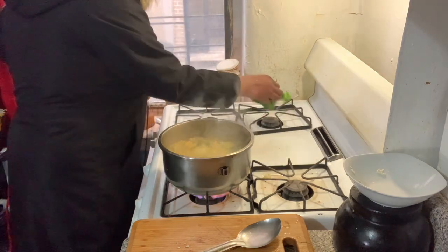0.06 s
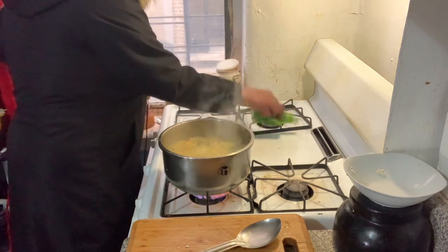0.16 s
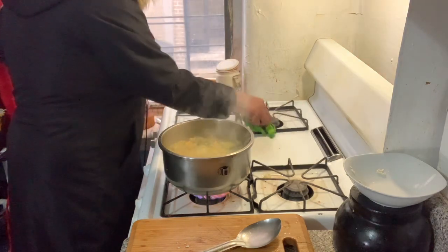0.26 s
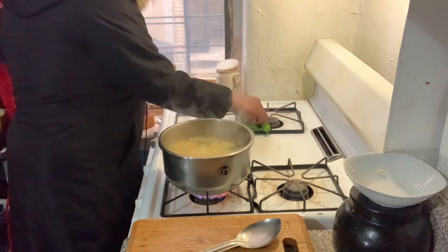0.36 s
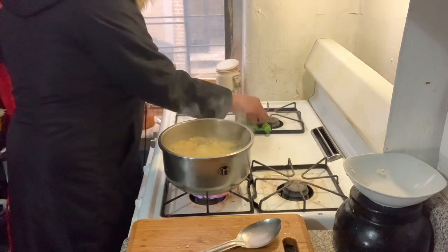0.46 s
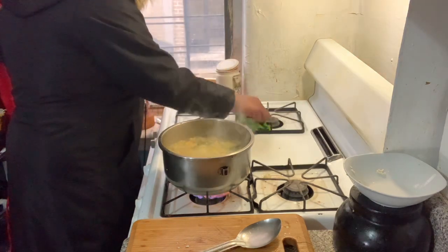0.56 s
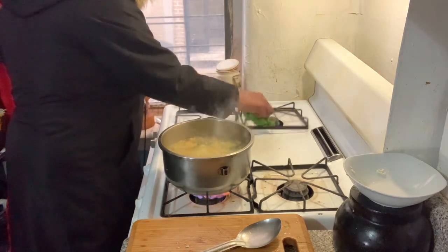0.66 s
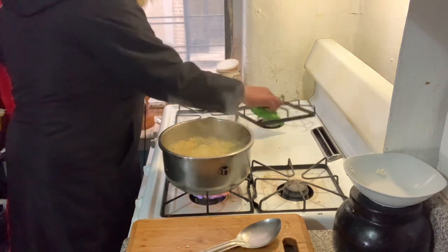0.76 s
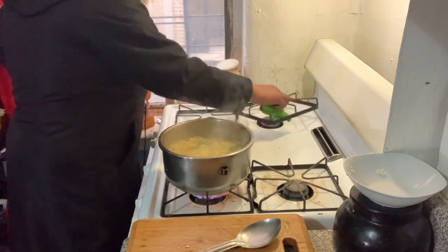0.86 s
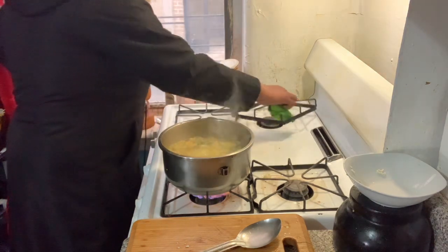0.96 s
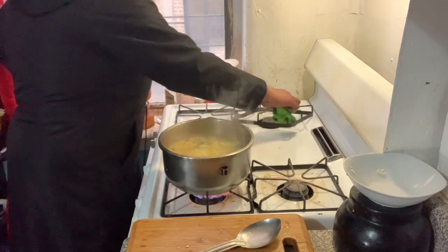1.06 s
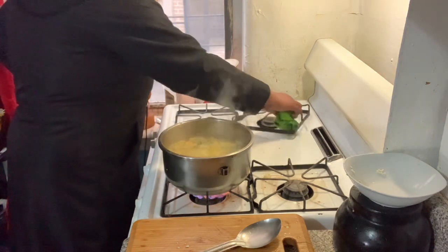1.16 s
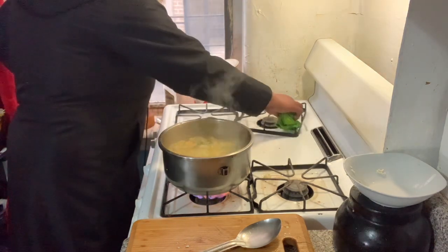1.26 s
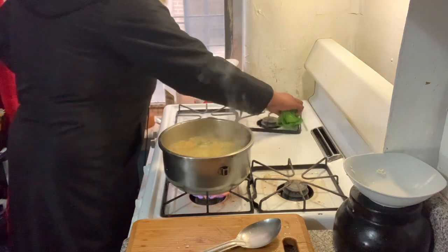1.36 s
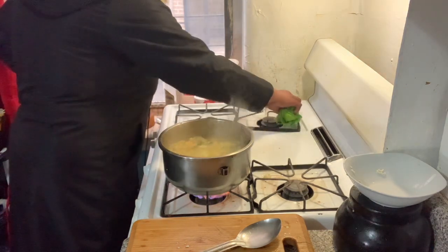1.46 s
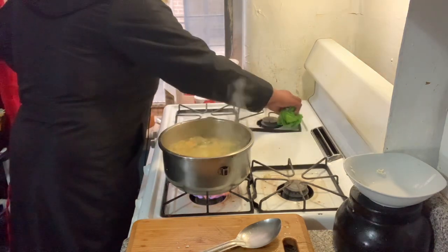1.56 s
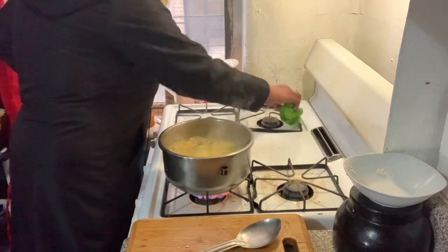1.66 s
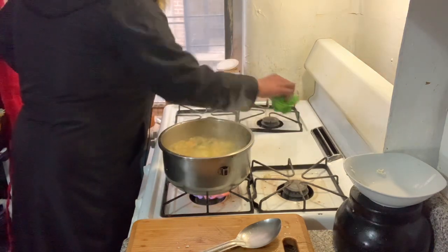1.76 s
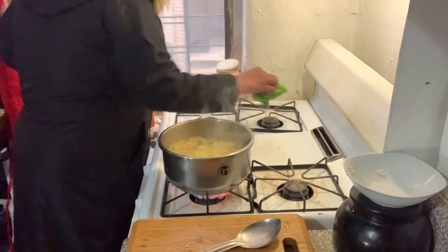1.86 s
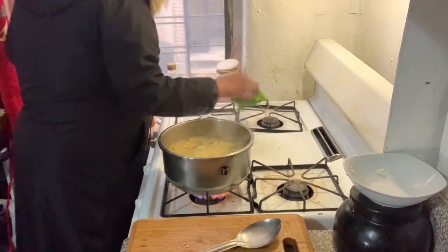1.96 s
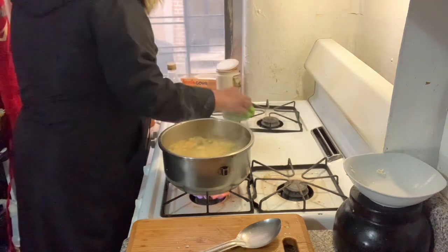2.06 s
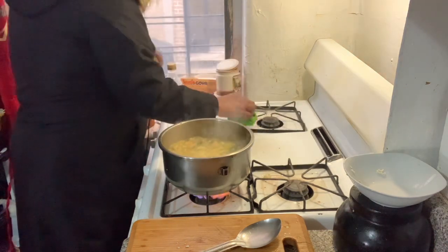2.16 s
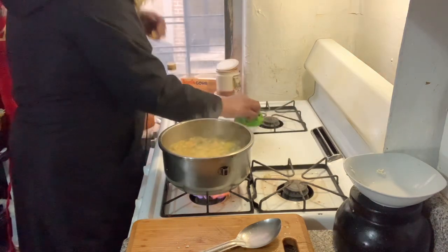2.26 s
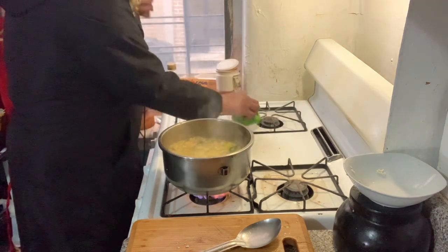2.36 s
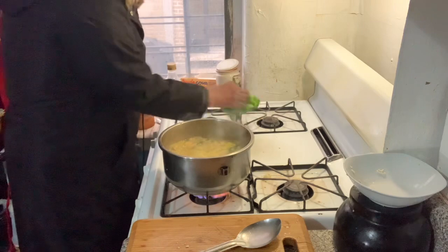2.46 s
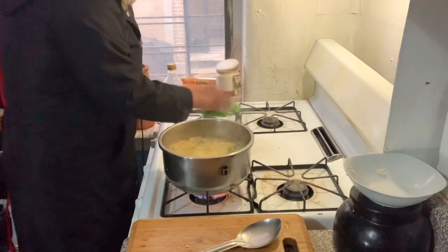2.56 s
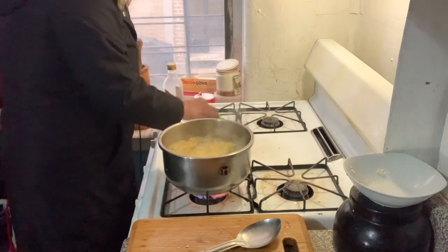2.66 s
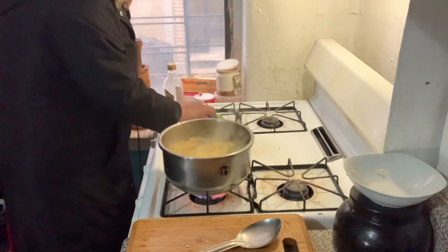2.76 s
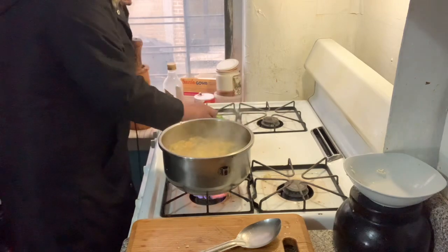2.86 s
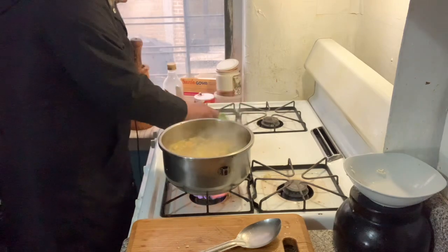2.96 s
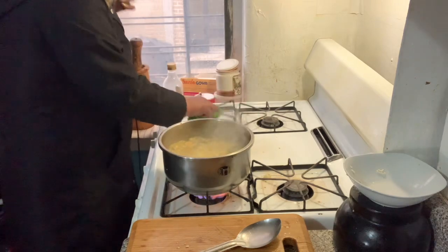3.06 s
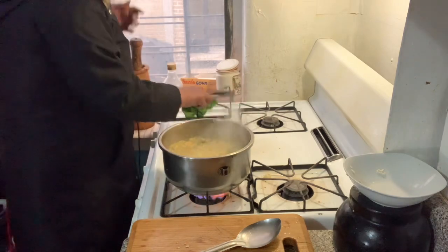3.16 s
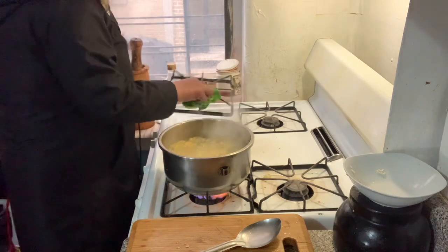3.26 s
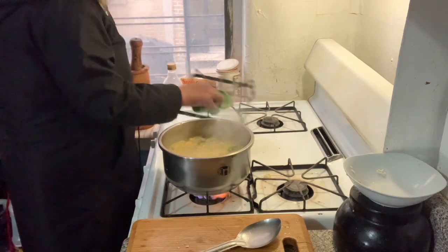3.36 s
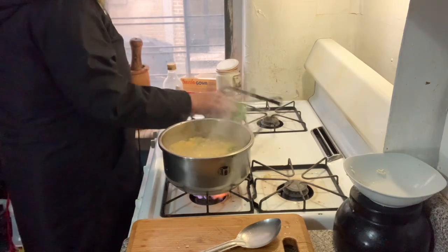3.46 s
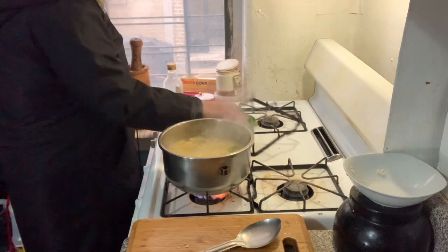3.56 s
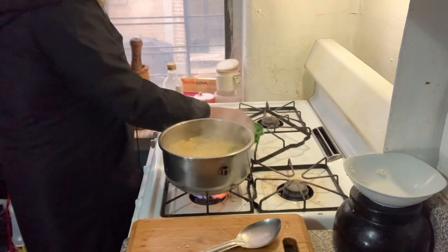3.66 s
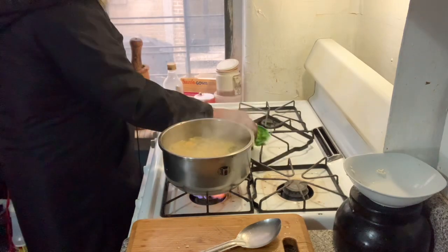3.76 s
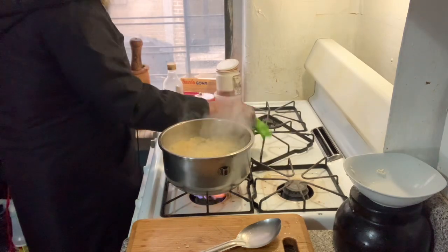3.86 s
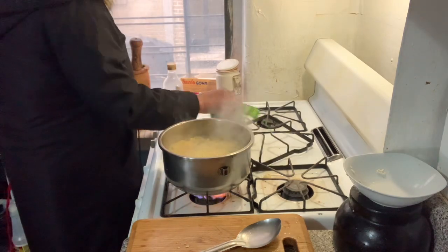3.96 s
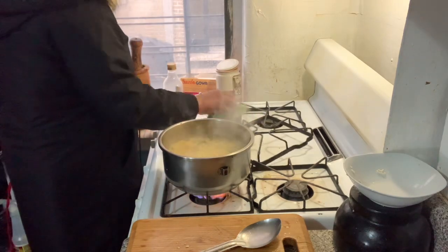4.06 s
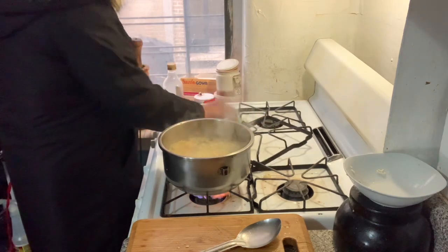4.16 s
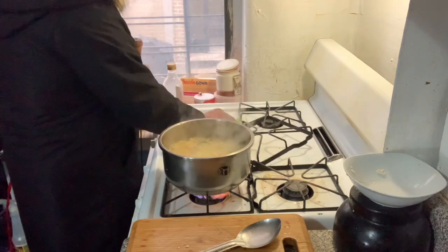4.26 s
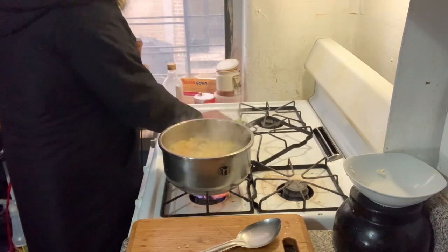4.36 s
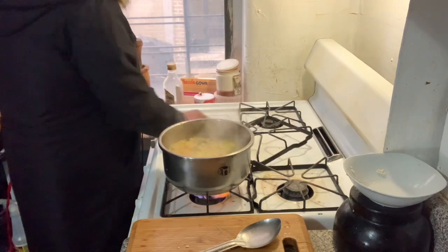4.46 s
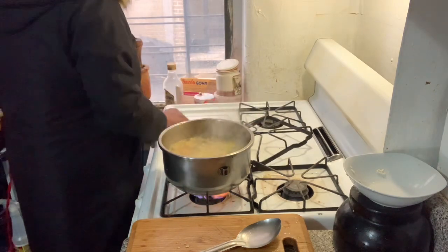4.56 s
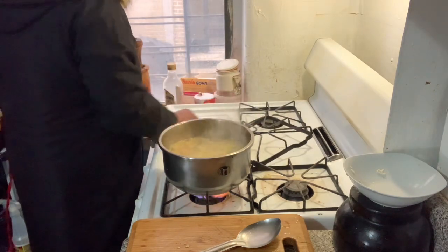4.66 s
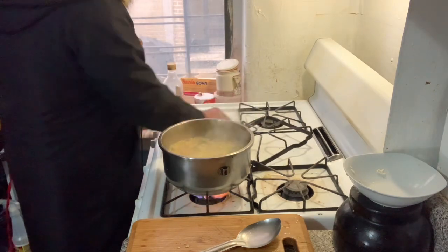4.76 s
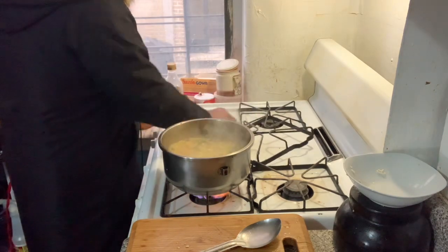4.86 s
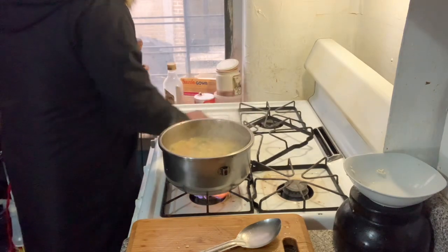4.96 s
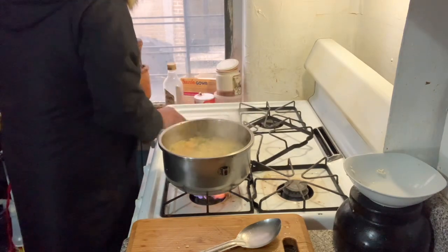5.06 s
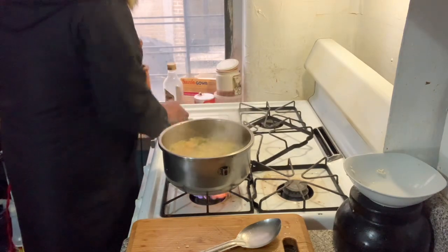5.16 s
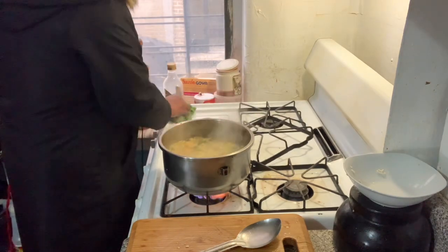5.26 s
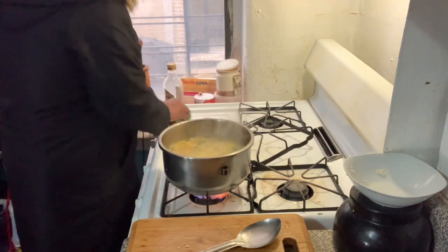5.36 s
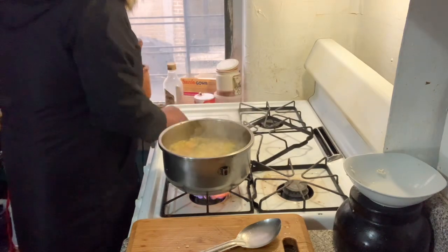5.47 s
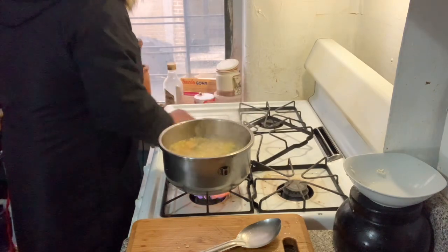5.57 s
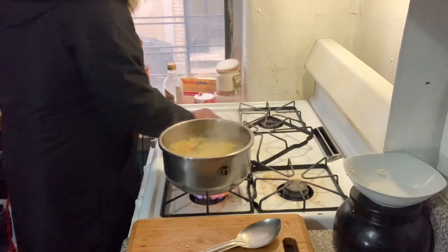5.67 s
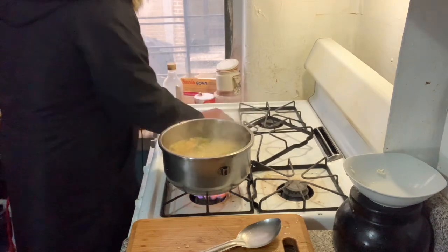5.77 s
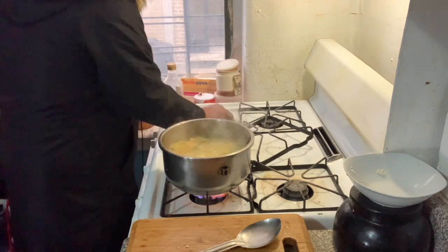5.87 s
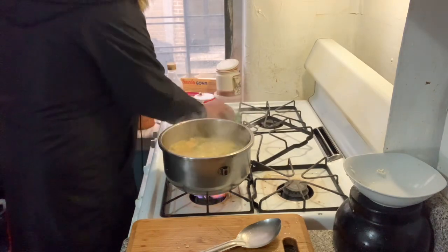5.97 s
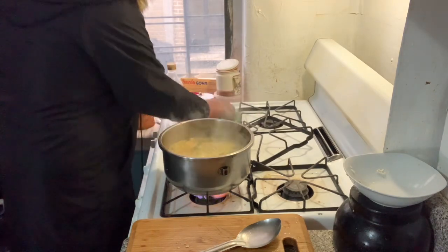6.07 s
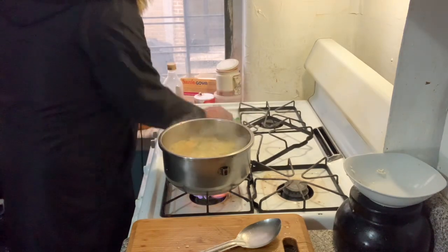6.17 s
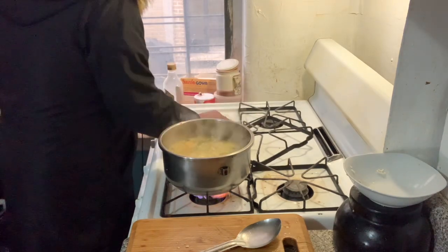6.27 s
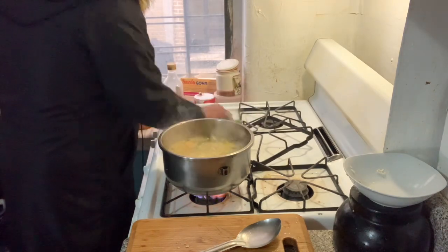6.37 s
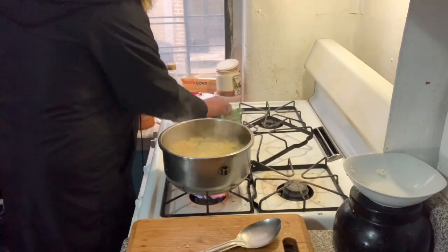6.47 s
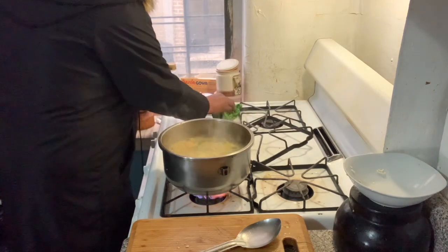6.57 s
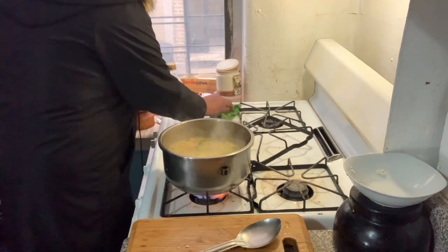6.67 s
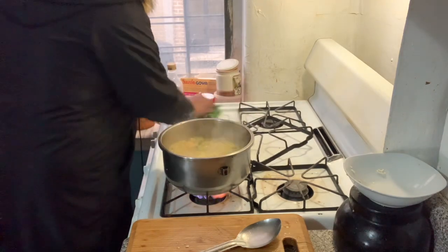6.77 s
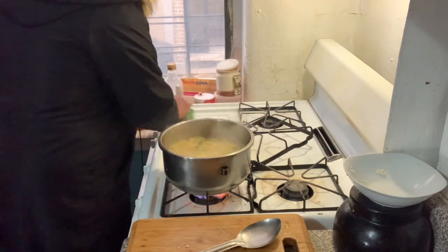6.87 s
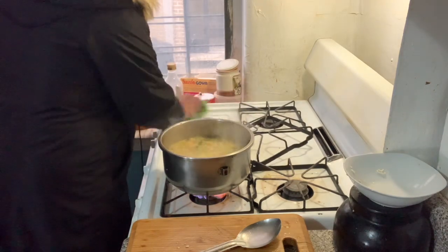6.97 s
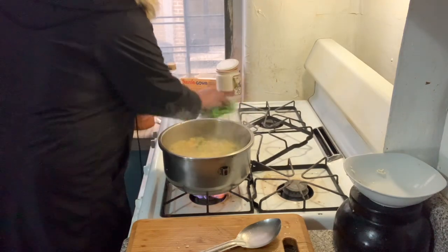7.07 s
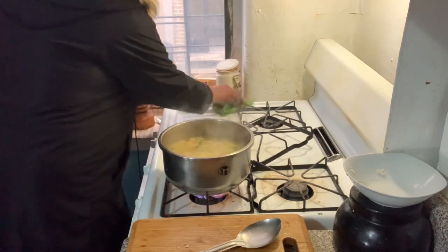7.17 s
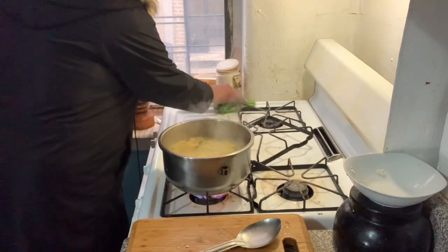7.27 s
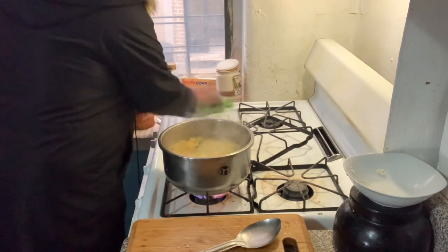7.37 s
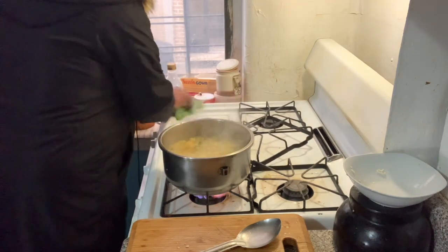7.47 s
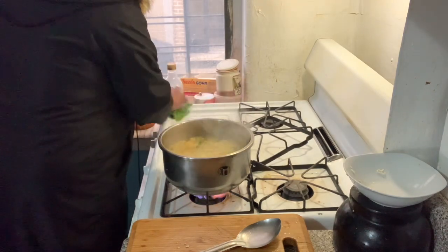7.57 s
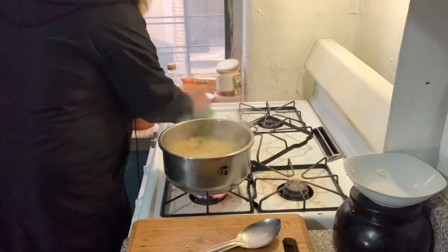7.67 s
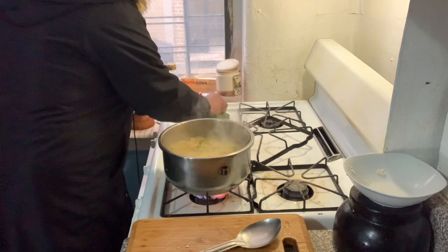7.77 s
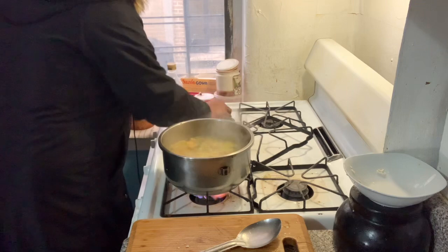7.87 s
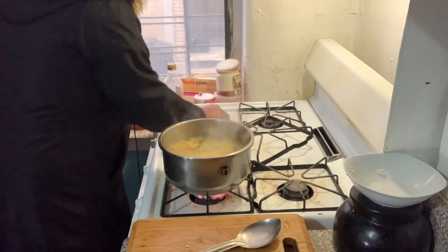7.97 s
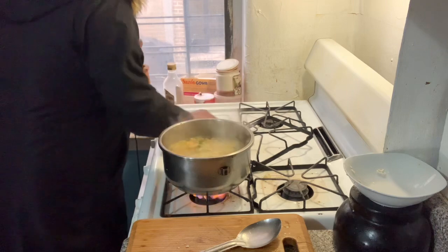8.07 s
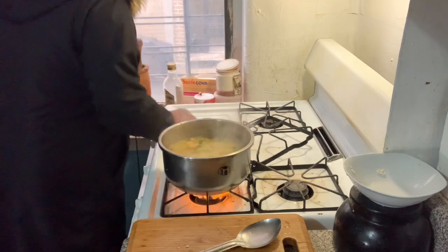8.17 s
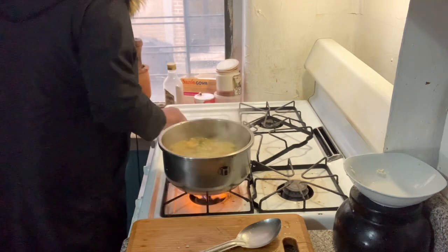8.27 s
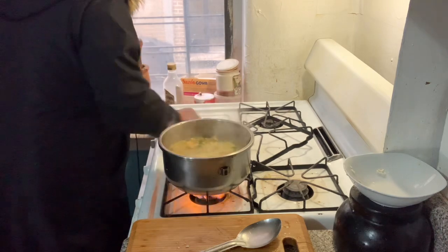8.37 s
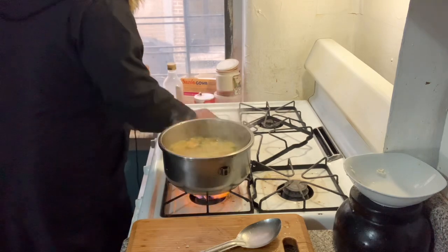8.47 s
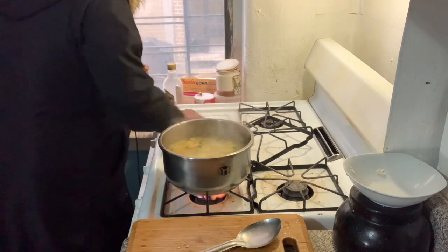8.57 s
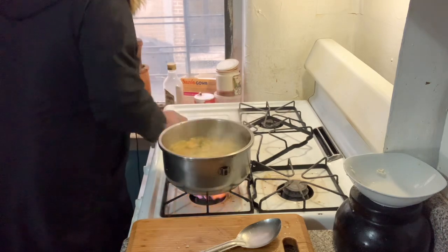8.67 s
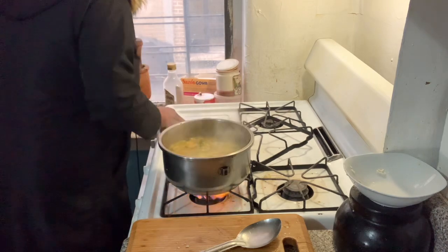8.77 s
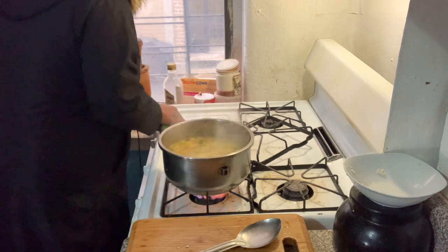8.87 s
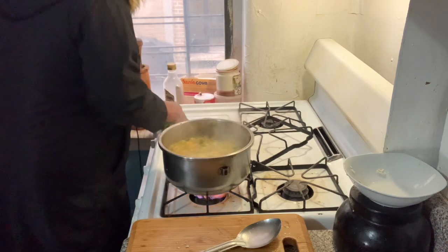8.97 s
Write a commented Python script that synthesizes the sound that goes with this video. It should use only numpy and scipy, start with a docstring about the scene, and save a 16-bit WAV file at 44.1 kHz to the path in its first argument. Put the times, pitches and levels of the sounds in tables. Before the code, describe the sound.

A home kitchen heard close up in stereo, with a short, hard room response. Throughout, a gas burner flutters low with a thin hiss, and a pot simmers with tiny soft pops. From 0.3 s iron pan supports knock dully on the hollow enamelled stove top; between 1.0 and 1.5 s the blows grow sharper, with clinks and low booms. A sponge swishes at about 0.2 and 1.4 s, and a small squeak comes at 1.9 s. The loudest clanks arrive around 2.2 s, ringing briefly. Two wipes follow near 2.8 and 3.0 s, then a squeak at 3.3 s. Strong knocks cluster at 3.7-4.2 s. The hiss swells at 4.5 s and again near 5.9 s. Afterwards mostly light taps remain, with firmer bumps around 6.5, 7.2 and 8 s, and short high squeaks at 5.5, 6.3, 6.6 and 8.3-8.9 s, ending with a faint wipe.

```python
"""A burner hisses and flutters under a gently popping pot while someone wipes a gas stove.
From the start, iron pan supports knock and clink on the enamelled top, which booms under some blows.
A wet sponge swishes now and then, and squeaks from about 2 s; more knocks cluster near 4 s.
The gas hiss swells near 4.5 s, and after that come mostly lighter touches and more squeaks.
Blows are built from noise and fading tones, the burner and wipes from shaped noise, squeaks from gliding tones."""
import sys
import numpy as np
from scipy import signal
from scipy.fft import rfft, irfft, next_fast_len
from scipy.io import wavfile
from scipy.ndimage import uniform_filter1d

SR = 44100
rng = np.random.default_rng(int(sys.argv[2]) if len(sys.argv) > 2 else 0)


def waveform_to_disk(signal):
    """Save audio, clipped to [-1, 1], as 16-bit WAV at the path in sys.argv[1]."""
    frames = np.transpose(np.atleast_2d(signal))
    scaled = np.clip(frames, -1, 1) * 32767
    samples = np.round(scaled).astype(np.int16)
    wavfile.write(sys.argv[1], SR, samples)


N = 398223  # samples, about 9 s
RING_SIZE = 24576  # samples set aside for one blow, wipe or squeak

# low modes of the stove's hollow body: (pitch [Hz], relative level [dB], time to fall 60 dB [s])
HOLLOW_MODES = [(107.7, -3.5, 0.58), (169.6, -1, 0.25), (206.1, -1, 0.26), (240.7, -5.5, 0.23)]


def gain_of(db):
    """Turns decibels into amplitude."""
    return 10 ** (np.asarray(db) / 20)


def evened(x):
    """Scales a sound to an rms of 1."""
    return x / np.sqrt(np.mean(x ** 2) + 1e-20)


def read(points, hz, axis=1):
    """Reads one column of a table, joined by straight lines over log frequency."""
    table = np.transpose(points)
    return np.interp(np.log(hz + 1), np.log(table[0] + 1), table[axis])


def bump(hz, centre_hz, octaves):
    """A bell curve of height 1 over log frequency."""
    return np.exp(-.5 * (np.log2((hz + 1) / centre_hz) / octaves) ** 2)


def add(mix, s, sound):
    """Mixes a stereo sound in at time s."""
    part = mix[:, max(round(s * SR), 0):][:, :sound.shape[1]]
    part += sound[:, :part.shape[1]]


def drift(per_s):
    """Slow random motion of rms 1; a larger per_s [Hz] lets it move faster."""
    hz = np.fft.rfftfreq(2048, N / SR / 2048)
    steps = rng.standard_normal(2 * len(hz) - 2)
    slow = irfft(rfft(steps) / (1 + (hz / per_s) ** 2))
    return evened(np.interp(np.linspace(0, len(slow) - 1, N), np.arange(len(slow)), slow))


def ripple(size, count):
    """Uneven peaks and dips of rms 1 along a spectrum or a sound, each about count steps wide."""
    smooth = uniform_filter1d(rng.standard_normal(size), count)
    return evened(uniform_filter1d(smooth, count))


def ports(hz):
    """How the right microphone port follows the left: shared part, own part, and the gain of each side."""
    # the two ports:
    # (pitch [Hz], likeness [0-1], lead of the left [radians], left minus right [dB])
    port_table = [(50, .97, 0, -1), (130, .82, .3, 2.5), (330, .6, .3, 7), (600, .66, -1.15, 3),
                  (1100, .78, -1, 1), (1800, .33, -1.2, 1.8), (3000, .3, -2.2, 2), (5000, .2, -3.3, 1.8),
                  (6600, .45, -5.5, 2), (7600, .7, -3.5, 1.5), (8500, .998, -3.14, 0),
                  (9700, .995, -3.1, 0), (10400, .87, -2.5, 0), (11700, .8, -1.3, 0), (13000, .99, 0, 0)]
    same = np.clip(read(port_table, hz, axis=1), 0, 1)
    lead = read(port_table, hz, axis=2)
    tilt = gain_of(read(port_table, hz, axis=3) / 2)
    return same * np.exp(-1j * lead), np.sqrt(1 - same ** 2), np.array([tilt, 1 / tilt])


def field(shared, own, sides):
    """Spectra of random phase as the two ports hear them."""
    a, b = np.exp(2j * np.pi * rng.random((2, len(own))))
    return sides * np.array([a, shared * a + own * b])


def noise(spectrum):
    """Steady stereo noise of rms 1, with the balance of low and high set by a spectrum."""
    size = next_fast_len(N, True)
    hz = np.fft.rfftfreq(size, 1 / SR)
    return evened(irfft(field(*ports(hz)) * gain_of(read(spectrum, hz)), size)[:, :N])


def kitchen_air(air_db=-67):
    """The still kitchen: quiet, steady noise."""
    # colour of the room's noise: (pitch [Hz], relative level per Hz [dB])
    air = [(1000, 8), (2200, 4), (4000, 16.5), (6200, 14.5), (7600, 1.5), (11800, -3), (13000, -5),
           (14600, -45)]
    return gain_of(air_db) * noise(air)


def burner(flame_db=-50, flutter_db=1.35, waver_db=1.75, hum_db=-3, hum_wander=3.75):
    """The flame flutters as low noise under a wavering gas hiss, with two low tones of unsteady pitch."""
    # colour of the flame's noise: (pitch [Hz], relative level per Hz [dB])
    flame_colour = [(12, -55.5), (20, -69.5), (41, 2), (76, -6), (111, 1), (181, -10.5), (255, -5),
                    (294, -10), (325, -6), (440, -21), (487, -18), (840, -19), (1160, -21.5), (2040, -28),
                    (2500, -31.5), (3250, -30.5), (5500, -120)]
    # colour of the gas jet's hiss: (pitch [Hz], relative level per Hz [dB])
    hiss_colour = [(1500, -23), (2800, -3), (4500, -3), (6200, -1), (7600, -0.5), (9000, 3), (11800, 2),
                   (13000, -5.5), (14400, -11.5), (15200, -36.5)]
    # level of the hiss before its waver: (time [s], level [dB])
    hiss_level = [(0, -73.5), (1.9, -68), (4.2, -67.5), (4.5, -60), (4.9, -63.5), (5.7, -65.5),
                  (5.9, -60.5), (7.7, -66.5), (9, -66)]
    # low tones: (pitch before wandering [Hz], level before hum_db is added [dB])
    hum_tones = [(113.0, -58.5), (323.0, -72)]
    t = np.arange(N) / SR
    flame = noise(flame_colour) * gain_of(flame_db + flutter_db * drift(14))
    hiss_db = np.interp(t, *np.transpose(hiss_level)) + waver_db * drift(36)
    hiss = noise(hiss_colour) * gain_of(hiss_db)
    hum = np.zeros(N)
    for hz, db in hum_tones:
        phase = 2 * np.pi * hz * t + hum_wander * drift(1.24)  # wander in radians
        hum += gain_of(db + hum_db) * np.sin(phase)
    return flame + hiss + hum


def seething(x, patch_db=2.5):
    """The burner and room noise are uneven: small patches of the spectrum swell and fade."""
    hz, _, z = signal.stft(x, SR, nperseg=512)
    patches = rng.standard_normal(z.shape[1:])
    # smooth twice across pitch, then twice along time
    for axis, size in [(0, 9), (0, 6), (1, 8), (1, 5)]:
        patches = uniform_filter1d(patches, size, axis=axis)
    depth = read([(300, .2), (1200, 1), (6000, 1), (12000, .5)], hz)[:, None]
    patch_gain = gain_of(patch_db * depth * evened(patches))
    return signal.istft(z * patch_gain, SR, nperseg=512)[1][:, :N]


def simmer(count=110, level_db=-63, spread_db=9, pop_t60=0.06):
    """Small bubbles burst at random in the pot, each a soft blip of its own pitch; a few are large."""
    size_samples = RING_SIZE // 6
    t, hz = np.arange(size_samples) / SR, np.fft.rfftfreq(size_samples, 1 / SR)
    out, pair = np.zeros((2, N)), ports(hz)
    shape = gain_of(-60 * t / pop_t60) * (1 - np.exp(-t / 0.0017))
    for when, size, pitch in rng.random((count, 3)):
        pop_hz = 850 * 4 ** pitch  # 850 to 3400 Hz
        pop = evened(irfft(field(*pair) * bump(hz, pop_hz, .25)))
        add(out, when * N / SR, gain_of(level_db + spread_db * size ** 2) * pop * shape)
    return out


def sponge(wipe_hz=3020, wipe_octaves=1.3, grain_db=2):
    """Wiping is broad noise that swells and dies, its level shaken quickly to make it grainy."""
    # broad wipes: (time [s], time from start to loudest, doubled [s], peak level before graininess [dB])
    wipes = [(0.24, 0.047, -55.5), (1.424, 0.13, -49), (2.782, 0.092, -52.5), (2.981, 0.12, -49),
             (8.863, 0.08, -58)]
    t, hz = np.arange(RING_SIZE) / SR, np.fft.rfftfreq(RING_SIZE, 1 / SR)
    out, pair = np.zeros((2, N)), ports(hz)
    for s, length, db in wipes:
        rub = evened(irfft(field(*pair) * bump(hz, wipe_hz, wipe_octaves) * (hz < 14800)))
        u = 2 * t / length
        stroke = (u * np.exp(1 - u)) ** 2
        add(out, s, gain_of(db) * rub * stroke)
    return out * gain_of(grain_db * drift(51))


def squeaks(squeak_s=0.039, glide=-0.043, jitter=0.062, room_t60=.28):
    """Where the sponge grips the enamel it sticks and slips: a short, unsteady whistle that the room prolongs."""
    # squeaks: (time [s], level before the room is added [dB], middle pitch before jitter [Hz])
    squeak_table = [(1.916, -55.5, 4510), (3.284, -60.5, 5940), (5.451, -51.5, 5820), (6.32, -59, 4100),
                    (6.62, -57, 6700), (8.27, -57, 4600), (8.41, -57, 5530), (8.59, -70, 2500),
                    (8.869, -58.5, 3820)]
    t, hz = np.arange(RING_SIZE) / SR, np.fft.rfftfreq(RING_SIZE, 1 / SR)
    out, pair = np.zeros((2, N)), ports(hz)
    u = t[t < squeak_s] / squeak_s
    for s, db, pitch_hz in squeak_table:
        # glide and jitter are shares of the pitch
        slip_hz = pitch_hz * (1 + glide * (u - .5) + jitter * ripple(len(u), count=24))
        whistle = np.sin(np.pi * u) * np.sin(2 * np.pi * np.cumsum(slip_hz) / SR)
        room = irfft(field(*pair)) * gain_of(-60 * t / room_t60)
        room = 2 * room / np.linalg.norm(room[0])
        add(out, s, gain_of(db) * signal.fftconvolve(whistle[None], room, axes=1))
    return out


def contacts(rebound_s=.026, rebound_clink_db=-2.5):
    """Lists every blow; some have a duller rebound, when the support rocks onto its other foot."""
    # a pan support is set down or bumped; levels after the strength are relative to it,
    # except the boom, which is relative to the thud:
    # (time [s], strength [dB], clink [dB], upper-mid bite [dB], edge tick [dB], centre of the knock [Hz],
    #  knock [dB], rebound share [0-1], iron ring [dB], knock length [s], boom [dB], hollow bloom [dB])
    blows = [(0.274, -25.5, -27.5, 5, -23, 477, 0.5, .57, 1, 0.12, 7, -12),
             (.303, -22.5, -40, 0, -50, 414, 6.5, 0, -7.5, 0.084, 0, -6.5),
             (.325, -30.5, -30, -1, -33, 1125, 10.5, 0, -5, 0.043, -8, -25),
             (.328, -29, -28, 2, -38, 593, 5, 0, -3.5, .06, -8, -14),
             (.37, -35, -21, 2.5, -16, 550, 14, .22, 0, 0.067, -16, -27),
             (.372, -32, -36, -4, -40, 343, 14, 0, -10, 0.1, -10, -13),
             (0.567, -51, -26, -2, -37, 1210, 16, 0, -6, 0.042, -8, -20),
             (.634, -28.5, -30, -2, -38, 429, 10.5, .3, -0.5, 0.087, -11, -9.5),
             (.637, -36.5, -19.5, 4, -36, 701, 9.5, 0, -10, 0.1, -11, -20),
             (.719, -46, -30, -2, -36, 518, 20, 0, -12, .062, -10, -13),
             (.788, -29, -25.5, 10, -19, 620, -2, 0, -3, .1, -2, -5),
             (0.819, -24.5, -40, 6, -26, 472, 3, 0, -8, 0.11, 13, -5),
             (.945, -30, -26.5, -5, -26, 459, 7, .5, -1.5, 0.11, 11, -9.5),
             (.946, -35.5, -28, -7, -24, 870, 6.5, 0, -11, .1, -8, -22),
             (1.072, -21, -52, -10, -46, 630, 8, 0, -3, .076, -6, -24),
             (1.074, -31.5, -35, -4, -48, 373, 13.5, 0, 8, 0.19, -6, -20),
             (1.087, -29, -38, -5, -46, 560, 13, 0, -3, .08, -6, -20),
             (1.104, -23.5, -12.5, -2, -11, 370, 1.5, 0, -3.5, 0.066, 1, -16),
             (1.142, -25, -36, -6, -28, 602, -4, 0, -10, 0.079, 0, -18),
             (1.154, -23, -17.5, 0, -16, 595, 9.5, 0, -16, 0.075, 3, -7.5),
             (1.272, -19, -11, -1.5, -4, 1125, 1.5, 0, -9.5, 0.09, 10.5, -18),
             (1.473, -23, -40, -2, -25, 550, -4, 0, -10, 0.19, 10, -17),
             (1.517, -15.5, -10.5, 0, 4.5, 563, 5.5, .3, -1, 0.13, 6, -30),
             (1.522, -22.5, -18, 7, -8, 1460, 5.5, 0, 2.5, 0.082, -5, -25),
             (1.533, -22.5, -12.5, 0, -5, 1095, 18.5, 0, -4.5, 0.048, 4, -21),
             (2.163, -35, -12, 0, -5, 583, 12, 0, -2, 0.082, 3, -25),
             (2.183, -16, -13.5, -1.5, -16.5, 1150, 8, 0, -0.5, 0.029, -2, -27),
             (2.207, -25, -13, 4, -15, 597, 8, 0, -2, 0.12, -4, -10),
             (2.241, -11, -25.5, 11, -34, 1070, 3.5, .3, 0.5, 0.081, -6, -16.5),
             (2.245, -16, 0, -5, 7.5, 638, 9.5, 0, -5.5, 0.11, 1, -18),
             (2.309, -21, -15.5, 5.5, -29, 1090, 14, 0, -8.5, 0.056, 0, -22),
             (2.383, -29, -23, 5, -28, 1035, 2, 0, -3, .081, -4, -32),
             (2.477, -28, -21.5, 3.5, -48, 663, 7.5, 0, -8, 0.031, 3, -31),
             (2.965, -41, -9, 2, -1, 335, -15, 0, -0.5, .065, -1, -20),
             (3.217, -44, -19, 0, -14, 1310, 6, 0, -5, .05, 9, -13),
             (3.395, -43.5, -19, 7.5, -26, 1220, 10, 0, -3.5, 0.035, -15, -20),
             (3.658, -34.5, -18.5, -11, -20, 681, 11.5, .5, -12, .08, 15.5, -4),
             (3.662, -40.5, -26, 0, -15, 455, 16, 0, -7, 0.11, 4, -22),
             (3.765, -28, -8.5, 1, -10, 1150, -6, 0, -1, .05, 9, -21),
             (3.77, -20, -18.5, 1.5, -23, 491, 8.5, .5, 3.5, 0.11, 4, -27),
             (3.809, -16.5, -12.5, 0.5, -14.5, 513, 5.5, .3, -5, 0.058, -10, -10),
             (4.112, -14, -13, -1.5, -11.5, 388, 5, 0, -3, 0.066, -11, -29),
             (4.121, -20, -25, 6.5, -21, 677, 7, 0, 4, 0.076, -10, -23),
             (4.138, -25.5, -19, 2, -24, 1190, 11, 0, 3, .057, -2, -25),
             (4.175, -27.5, -37, 0, -23, 648, 9, 0, 3.5, 0.16, -5, -25),
             (4.318, -42.5, -28, 0, -30, 1710, 10.5, 0, -6, 0.042, -11, -20),
             (5.046, -30.5, -31.5, 4.5, -15, 356, 5, 0, -4.5, .06, -6, -26),
             (5.55, -49.5, -16, 3, -25, 1350, 3, 0, 5, 0.068, -10, -13),
             (5.82, -39, -42, -9, -25, 604, 6, 0, -3, 0.24, -1, -3),
             (5.868, -32.5, -26.5, 1, -30, 420, 7, 0, 1, 0.046, -1, -13),
             (6.03, -55, -3, 0, -24, 1540, 17, 0, -2, 0.053, -5, -20),
             (6.44, -41.5, -21, 6, -24, 1400, -11, 0, 1, .05, -6, -20),
             (6.532, -23, -23, 3.5, -25, 673, 6.5, .5, 0, 0.13, -13, -27),
             (6.533, -35, -22, 7, -30, 1166, 6, 0, -14, 0.087, -10, -25),
             (6.815, -52, -29, 5, -24, 1700, 10, 0, 7, .044, -3, -23),
             (7.159, -31.5, -24.5, 3, -24, 602, 9, 0, 2, 0.15, -16, -26),
             (7.178, -34, -30, 0, -9, 792, 14, 0, -6, 0.073, -20, -23),
             (7.325, -50.5, -8, -2, -23, 1470, 17, 0, -11, 0.035, -11, -18),
             (7.421, -49, -25, -3, -25, 1600, 8, 0, -5, 0.045, -11, -23),
             (7.636, -48, -35, -14, -20, 1500, -1, 0, -3, .04, -7, -22),
             (7.798, -38.5, -34, 4, -17, 1210, -2, 0, -4, .047, -9, -23),
             (7.873, -29.5, -18, -3.5, -18, 605, 2, 0, -5.5, 0.031, -3, -9),
             (8.003, -29, -8.5, -2.5, -10, 900, -4, 0, -12, 0.03, 14, -12),
             (8.691, -39.5, -19, 0, -13, 1990, -2, 0, -0.5, .044, 8, -22)]
    hits = []
    for s, db, clink_db, bite_db, tick_db, knock_hz, knock_db, share, *body in blows:
        hits.append((s, db, clink_db, bite_db, tick_db, knock_hz, knock_db, *body))
        if share > .2:
            hits.append((s + rebound_s, db + 20 * np.log10(share), clink_db + rebound_clink_db, bite_db,
                         tick_db + rebound_clink_db, knock_hz, knock_db, *body))
    return hits


def contact(hz, clink_db, tick_db, thud_db, knock_hz, knock_db, early_rolloff=0.18):
    """Colour of one blow: hard edges add treble, weight adds bass, the spot struck favours one pitch."""
    slope = [(90, thud_db + 22.0), (200, thud_db + 10.5), (440, 0.0092), (1150, 0.0048),
             (1600, early_rolloff * clink_db), (2900, clink_db + 1.5), (6500, clink_db + 4.0),
             (11000, tick_db + 4.0)]
    return gain_of(read(slope, hz) + knock_db / 2 * bump(hz, knock_hz, .25))


def clang_shapes(t, hz, room_rise=0.012):
    """Overlapping bands and their envelopes: a short crack, then the room builds up; bass swells slowly."""
    # how the clang lives and dies: (pitch [Hz], rise [s], first crack [dB], crack time to fall 60 dB [s],
    #  room [dB], room time to fall 60 dB [s])
    life = [(60.5, 0.016, -7, .06, -1.5, 0.82), (157, 0.012, 8, 0.04, -0.5, 0.4),
            (422, 0.0011, -0.5, 0.047, -4, 0.53), (1090, 0.00035, 2.5, 0.17, -3, 0.58),
            (2960, 0.0024, 10.5, 0.11, 3, 0.44), (7000, 0.0052, 13, 0.041, -5, 0.41),
            (11910, 0.0005, 15.5, 0.064, 3.5, 0.39), (14900, .0004, 15.5, 0.033, -10.5, 0.039)]
    centres = np.array([60, 160, 420, 1100, 2900, 7000, 12500, 15000])
    bands = np.array([read(np.c_[centres, row], hz) for row in np.eye(len(centres))])
    columns = (read(life, centres[:, None], axis=k) for k in range(1, 6))
    rise, crack_db, crack_t60, room_db, room_t60 = columns
    crack = gain_of(crack_db - 60 * t / crack_t60)
    room = gain_of(room_db - 60 * t / room_t60) * (1 - np.exp(-t / room_rise))
    envelopes = (crack + room) * (1 - np.exp(-t / rise))
    return np.float32(bands[:, None]), np.float32(envelopes)[:, None]


def iron_ring(t, hz, colour, modes, iron_db=-19, spot_db=2.0, detune=0.0023):
    """The modes of a support and the top; each spot and grip weights and tunes them a little differently."""
    mode_hz, mode_db, mode_t60 = np.transpose(modes)
    spot, grip = rng.uniform(-1.06, 1, (2, len(modes)))
    mode_gain = np.interp(mode_hz, hz, colour) * gain_of(iron_db + mode_db + spot_db * spot)
    weights = field(*ports(mode_hz)) * mode_gain
    poles = 2j * np.pi * mode_hz * (1 + detune * grip) - np.log(1000) / mode_t60
    # build the fading tones in blocks of 128 samples, to save work
    starts, block = np.exp(np.outer(t[::128], poles)), np.exp(np.outer(poles, t[:128]))
    ring = ((weights[:, None] * starts) @ block).real.reshape(2, -1)
    return ring * (1 - np.exp(-t / 0.0003))


def hollow_modes(t, rise_s=0.017):
    """The low modes of the stove's hollow body, which swell just after a blow."""
    mode_hz, mode_db, mode_t60 = np.transpose(HOLLOW_MODES)[:, :, None]
    swell = (1 - np.exp(-t / rise_s)) ** 2
    return gain_of(mode_db - 60 * t / mode_t60) * np.exp(2j * np.pi * mode_hz * t) * swell


def knock(t, knock_hz, length, level_db=-13, fade_db=35, fade_bend=1.02, spread=0.1, flank_db=-8, count=3):
    """The struck spot: one hollow mode between two weaker ones, all dying away quickly and evenly."""
    place = np.linspace(-1, 1, count)
    mode_hz = knock_hz * np.exp(spread * place * rng.uniform(0.555, 1.49, count))
    weights = field(*ports(mode_hz)) * gain_of(flank_db * abs(place))
    ring = (weights @ np.exp(2j * np.pi * mode_hz[:, None] * t)).real
    fade = gain_of(level_db - fade_db * (t / length) ** fade_bend)
    return ring * fade * (1 - np.exp(-t / .0016))


def pan_supports(clang_db=-2.0, boom_db=-9.0, boom_hz=64.86, boom_t60=0.43, boom_rise=0.012, bite_hz=2400):
    """Each blow sets off a knock, the panel's clang, the ring of the iron, a hollow bloom and a low boom."""
    # dense clang of the sheet-metal top: (pitch [Hz], relative level per Hz [dB])
    panel_colour = [(30, -18), (65, 7), (85, -14), (120, 6), (250, 2.5), (550, 4), (850, -3.5), (1150, -6),
                    (1900, -4), (4000, 1.5), (6400, 0.5), (7600, -0.5), (11000, -9), (15500, -27)]
    # ring of the enamelled top: (pitch [Hz], relative level [dB], time to fall 60 dB [s])
    top = [(205.5, -2.5, .55), (342.8, 2.5, 0.21), (416, 0.5, 0.11), (473, -4, 0.29), (533, -0.5, 0.34),
           (571, -10.5, 0.16), (648, 6, 0.3), (764, -9, 0.45), (1066, -1, 0.35), (1085, -0.5, 0.34),
           (1139, -4, 0.28), (1185, 2, 0.18)]
    # ring of the right-hand support, handled first: (pitch [Hz], relative level [dB], time to fall 60 dB [s])
    right_support = [(1384, -8.5, .25), (1463, 0, 0.22), (1670, 0.5, 0.28), (1810, -4, .25), (2210, 7, 0.3),
                     (2885, -1.5, 0.48), (2930, 8, 0.32), (3300, -3, .2), (3980, 6.5, .3), (4560, 6, 0.28),
                     (4750, -1, .33), (4740, 2.5, .3), (5000, -5, 0.54), (5530, 5, 0.23), (6230, 2, 0.36),
                     (6610, 0, 0.2), (6700, 1, 0.16)]
    # ring of the left-hand support: (pitch [Hz], relative level [dB], time to fall 60 dB [s])
    left_support = [(1555, 2.5, 0.18), (1663, 0.5, .2), (1790, -5, .34), (2120, -2.5, 0.33),
                    (2320, -2, 0.45), (2450, -4, .36), (2740, 0, 0.41), (2880, 7, 0.23), (2940, 3, .45),
                    (3420, 10, 0.25), (3800, -1, 0.2), (4030, 9, 0.22), (4107, -2.5, .34), (4500, 10, 0.26),
                    (5400, -2, .32), (5900, 3.5, 0.27)]
    swap_s = 2.9  # from here on the left-hand support rings
    contact_s = .0008  # contact time of a 0 dB blow
    thud_0_db, thud_growth = -21, 0.61  # thud of a 0 dB blow, and its dB per dB of strength
    chatter_db, chatter_onset_s = 2, 0.022

    t, hz = np.arange(RING_SIZE) / SR, np.fft.rfftfreq(RING_SIZE, 1 / SR)
    bands, envelopes = clang_shapes(t, hz)
    panel, pair = gain_of(clang_db + read(panel_colour, hz)) * np.sqrt(RING_SIZE), ports(hz)
    crowd_db = read([(600, 0), (1500, 2.8), (3500, 3.2), (7000, 3.5), (9000, 4.5)], hz)
    boom = gain_of(boom_db - 60 * t / boom_t60) * (1 - np.exp(-t / boom_rise)) ** 2
    hollow, hollow_pair = hollow_modes(t), ports(np.transpose(HOLLOW_MODES)[0])
    out = np.zeros((2, N))
    for (s, db, clink_db, bite_db, tick_db, knock_hz, knock_db,
         ring_db, length, weight_db, hollow_db) in contacts():
        # the thud comes from the support's weight, so it grows more slowly than the rest of the blow
        thud_db = thud_0_db + thud_growth * db - db  # relative to the blow
        colour = contact(hz, clink_db, tick_db, thud_db, knock_hz, knock_db)
        colour = colour * gain_of(bite_db * bump(hz, bite_hz, 0.35))
        # every spot struck picks out others of the panel's many close resonances, at about the same power
        peaks = gain_of(crowd_db * ripple(len(hz), count=24) - crowd_db ** 2 / 8)
        spectrum = (field(*pair) * panel * colour * peaks).astype(np.complex64)
        clang = (irfft(spectrum * bands) * envelopes).sum(0)
        # a gentle touch stays in contact longer, so it starts more softly
        clang *= 1 - np.exp(-t / (contact_s * gain_of(-db / 2)))
        # the loose iron chatters as it settles, so the clang dies unevenly
        chatter = ripple(RING_SIZE, count=160) * (0.5 - np.exp(-t / chatter_onset_s))
        clang *= gain_of(chatter_db * chatter)
        support = right_support if s < swap_s else left_support
        ring = gain_of(ring_db) * iron_ring(t, hz, colour, top + support)
        bloom = gain_of(hollow_db) * (field(*hollow_pair) @ hollow).real
        # one running phase for all blows
        low = gain_of(thud_db + weight_db) * boom * np.sin(2 * np.pi * boom_hz * (t + s))
        add(out, s, gain_of(db) * (clang + ring + bloom + low))
        add(out, s, gain_of(db + knock_db) * knock(t[:RING_SIZE // 2], knock_hz, length))
    return out


def scene():
    """Everything on and around the stove."""
    steady = seething(kitchen_air() + burner())
    return steady + simmer() + sponge() + squeaks() + pan_supports()


def record(dry, edge_hz=15700):
    """The recorder's band limit: a filter that removes the highest treble."""
    low_pass = signal.firwin(255, edge_hz, window=("kaiser", 9), fs=SR)
    return signal.oaconvolve(dry, low_pass[None], "same")


dry = scene()
out = record(dry)
waveform_to_disk(out)
```